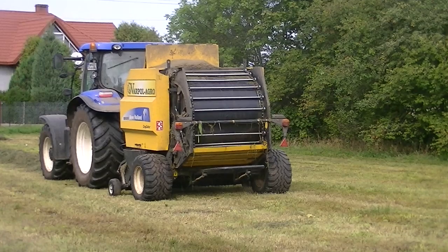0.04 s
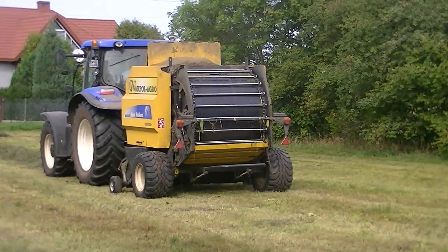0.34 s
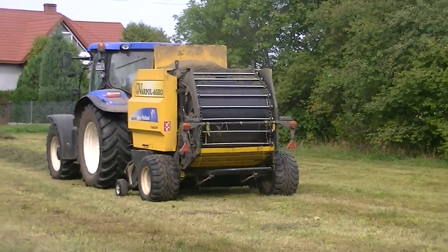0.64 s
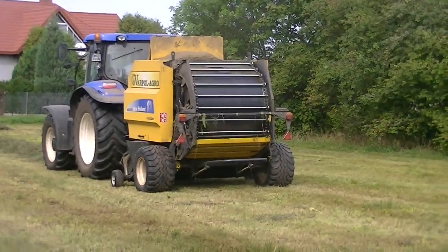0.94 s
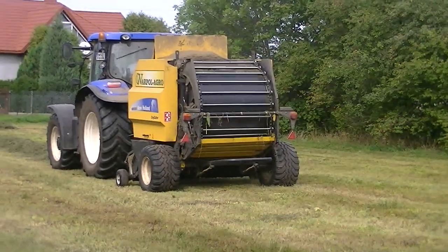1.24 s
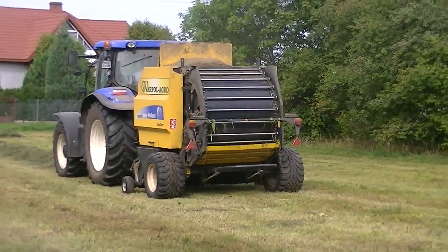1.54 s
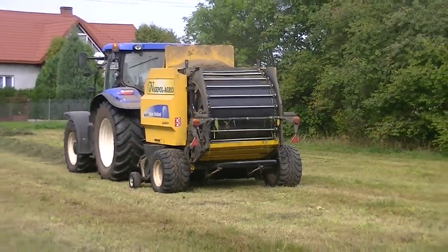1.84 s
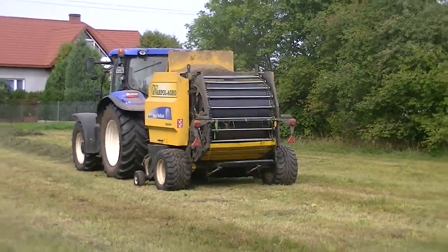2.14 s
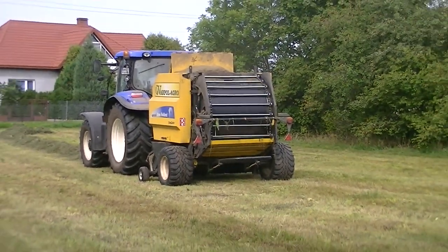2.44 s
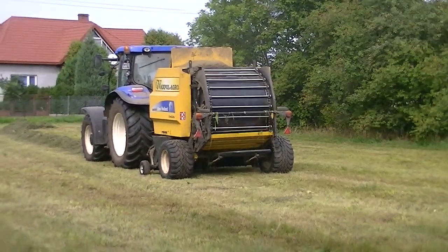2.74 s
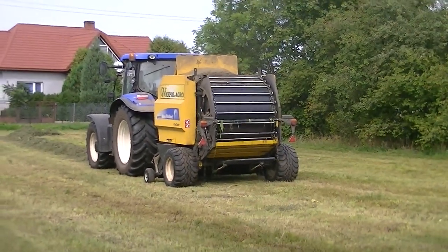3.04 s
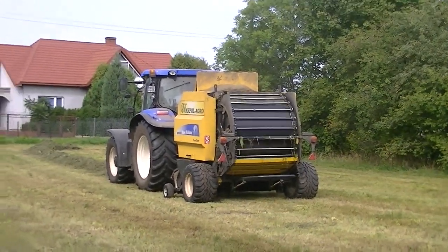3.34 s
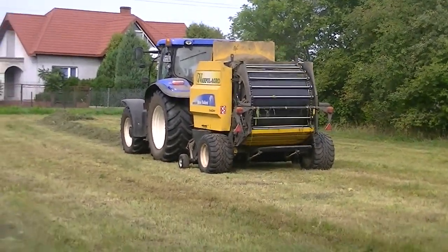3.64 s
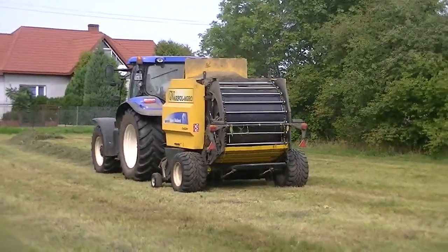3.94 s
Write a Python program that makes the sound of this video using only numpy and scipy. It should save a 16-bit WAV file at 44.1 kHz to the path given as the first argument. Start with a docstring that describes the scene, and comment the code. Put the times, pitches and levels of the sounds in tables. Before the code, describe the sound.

Rhythmic metal clatter and clanks come from a nearby hay baler working in an open field. Dry hay hisses, most at first, and the chain squeaks faintly, while the bale rumbles and bumps over a soft tractor drone.

```python
"""Sheet metal clatters, surging into a clank and a rebound about six times a second: a round hay baler
at work behind a tractor on a mown field, heard through one microphone near enough to catch the stalks.
Links and slats beat on the panels and the drive chain snaps tight against the frame. Underneath, the
bale rumbles and bumps in its chamber and the diesel drones. Dry hay hisses in the pickup, loudest at
first, and dry chain pins sing thinly."""
import sys
import numpy as np
from scipy import signal
from scipy.fft import rfft, irfft
from scipy.io import wavfile

SR = 44100
rng = np.random.default_rng(int(sys.argv[2]) if len(sys.argv) > 2 else 0)


def file_out(sig):
    """Save sig as 16-bit WAV at sys.argv[1]."""
    # one column per channel
    cols = np.atleast_2d(sig).T
    # limit, then scale
    lim = np.clip(cols, -1, 1)
    pcm = np.round(lim * 32767).astype(np.int16)
    wavfile.write(sys.argv[1], SR, pcm)


N = 176400
T = np.arange(N) / SR

# one row per turn of the drive: (time [s], clank [dB], clatter surge [dB], rebound delay [s], rebound [dB])
DRIVE_TURNS = [(0.105, -13, -23, 0.072, -8.5), (0.27, -14.5, -24, 0.052, -41),
               (0.435, -13.5, -19.5, 0.065, -7.5), (0.597, -14, -19, 0.075, -9.5),
               (0.762, -38, -19, 0.049, -13), (0.934, -22, -22, 0.061, -11.5),
               (1.094, -26, -18.5, 0.052, -16), (1.26, -22, -26, 0.065, -13),
               (1.424, -18, -21.5, 0.081, -15), (1.586, -15, -19, 0.06, -14.5),
               (1.755, -20.5, -20, 0.048, -12), (1.922, -24, -19.5, 0.043, -9.5),
               (2.081, -27, -19.5, 0.055, -11), (2.249, -20.5, -21.5, 0.058, -32),
               (2.412, -33, -21, 0.03, -17), (2.58, -20, -17, 0.078, -10.5),
               (2.735, -16, -21.5, 0.076, -30), (2.904, -16, -22.5, 0.036, -16),
               (3.062, -14.5, -18.5, 0.033, -41), (3.23, -16.5, -19, 0.024, -14),
               (3.392, -17, -19, 0.069, -15), (3.554, -13.5, -20.5, 0.05, -21),
               (3.719, -20.5, -22, 0.072, -15.5), (3.87, -46, -19, 0.094, -15)]
# low spectrum of the bale chamber and the exhaust: (frequency [Hz], level [dB])
RUMBLE_SPECTRUM = [(20, -49), (44, -48), (55, -33), (66, -50), (108, -15), (145, -0.5), (200, 3), (310, 0),
                   (450, -6), (900, -8.5), (3000, -65)]


def clatter(gain_db=-3.5, flutter_db=2.0):
    """Links and slats beat on the panels, harder at every turn and at its rebound."""
    # spectrum of a blow on sheet metal: (frequency [Hz], level [dB])
    blow_spectrum = [(30, -70), (100, -27), (300, -10.5), (480, -7), (650, -2.5), (900, -0.5), (1250, -2.5),
                     (1700, -6), (2200, -8.5), (2400, -11), (3300, -15), (4000, -26.5), (6000, -30),
                     (7300, -36), (7900, -49), (11000, -50.5), (15500, -62)]
    # panel resonances: (frequency [Hz], width [Hz], level [dB])
    panel_modes = [(401.7, 35, -12), (435, 68, -13.5), (559, 61, -4), (697, 90, 0.5), (773, 89, 0),
                   (1105, 140, 1), (1233, 67, 0), (1512, 106, -3), (1984, 92, 0.5), (2204, 98, -6.5),
                   (2626, 120, -10.5), (3179, 137, -4)]
    power = amp(-23 + flutter_db * drift(24)) ** 2
    for s, _, surge_db, delay, rebound_db in DRIVE_TURNS:
        power += (amp(surge_db + 3) * swell(s, rise_s=.033, fall_s=.025)) ** 2
        power += (amp(rebound_db - 6.5) * swell(s + delay, rise_s=.018, fall_s=.019)) ** 2
    force = np.sqrt(power)
    blows = force * impacts(per_s=3000, spread_db=0)
    loose_hits = amp(-32) * impacts(per_s=70, spread_db=1.5)
    knocking = through(blows + loose_hits, colour(blow_spectrum))
    ringing = through(force * impacts(per_s=900, spread_db=2), ring(panel_modes))
    return amp(gain_db) * (knocking + ringing)


def clanks():
    """Once a turn the chain snaps tight against the steel frame: a crack in a short jangle, then a slap."""
    # spectrum of the chain striking steel: (frequency [Hz], level [dB])
    crack_spectrum = [(200, -24), (900, -4), (1800, 1), (2500, 4), (3300, -19), (4100, -11), (4600, -27),
                      (4950, -12), (5400, -28), (7500, -30), (11000, -55), (15000, -76)]
    # frame resonances: (frequency [Hz], width [Hz], level [dB])
    frame_modes = [(1283, 58, -1), (1650, 40, -18.5), (1850, 360, 0), (2157, 33, 1.5), (2647, 89, -18.5),
                   (2850, 20, -13), (3080, 470, -2.5), (3647, 260, -6)]
    force = np.zeros(N)
    for s, clank_db, *_ in DRIVE_TURNS:
        crack = burst(s, rise_s=.004, fall_s=.007)
        jangle = amp(-7.5) * burst(s, rise_s=.012, fall_s=.016)
        slap = amp(-7) * burst(s + .019, rise_s=.004, fall_s=.007)
        force += amp(clank_db) * (np.hypot(crack, jangle) + slap)
    hits = force * impacts(per_s=4500, spread_db=-3.5)
    return amp(-5) * through(hits, colour(crack_spectrum)) + amp(-3) * through(hits, ring(frame_modes))


def bale_chamber(throb_hz=30.69, throb_depth=.18, boom_hz=198.5, waver_hz=30):
    """The bale rolls with a low throb and now and then bumps the chamber, which booms briefly."""
    # loudness of the rolling bale: (time [s], level [dB])
    roll_levels = [(0, -39), (.35, -41.5), (.7, -35), (1.3, -33.5), (1.9, -29.5), (2.6, -34), (2.85, -35.5),
                   (3.4, -34), (4, -36.5)]
    # knocks of the bale on the chamber: (time [s], relative level [dB])
    knocks = [(0.732, -14.5), (1.47, -26), (1.569, -34), (1.639, -20), (1.808, -13.5), (1.898, -32),
              (1.966, -20), (2.132, -19), (2.259, -26), (2.457, -21), (2.643, -17), (3.377, -23),
              (3.714, -17), (3.866, -14)]
    throb = 1 + throb_depth * np.cos(2 * np.pi * throb_hz * T + .3 * drift(2))
    roll = amp(contour(roll_levels)) * unit(throb * rng.standard_normal(N))
    pitch_hz = boom_hz + waver_hz * np.tanh(drift(40))
    boom = unit(np.sin(2 * np.pi * np.cumsum(pitch_hz) / SR))
    bumps = sum(amp(db - 11.5) * burst(s, rise_s=.01, fall_s=.016) for s, db in knocks)
    return through(roll, colour(RUMBLE_SPECTRUM)) + boom * bumps


def panel_hum():
    """The shaking keeps the hollow side panels sounding, most strongly at each turn of the drive."""
    # humming panel resonances: (frequency [Hz], width [Hz], level [dB])
    hum_modes = [(200, 31, -47), (394, 27, -49), (700, 51, -37), (770, 51, -40), (1135, 56, -39),
                 (1215, 51, -39), (2020, 81, -42)]
    shaking = unit(.55 + sum(burst(s, rise_s=.016, fall_s=.03) for s, *_ in DRIVE_TURNS))
    return shaking * sum(amp(db) * sing(hz, width) for hz, width, db in hum_modes)


def hay_hiss(flicker_db=3.4):
    """Dry stalks crackle and hiss in the pickup."""
    # spectrum of rustling hay: (frequency [Hz], level [dB])
    hay_spectrum = [(500, 13), (3000, -2), (5000, 6.5), (6300, 0), (8000, -5), (10500, -8), (12000, -23),
                    (15700, -33)]
    # loudness of the rustle: (time [s], level [dB])
    hay_levels = [(0, -37.5), (.3, -39.5), (.38, -43.5), (.54, -37.5), (.8, -44.5), (1.2, -48.5),
                  (1.9, -48), (2.8, -54), (3.4, -45.5), (3.93, -50.5), (3.98, -47)]
    level_db = contour(hay_levels) + flicker_db * drift(40)
    return amp(level_db) * through(impacts(per_s=6500, spread_db=-.5), colour(hay_spectrum))


def chain_squeaks(flicker_db=5):
    """Dry chain pins sing faintly and break into short squeaks."""
    # loudness of the faint singing: (time [s], level [dB])
    pin_levels = [(0, -64), (1.2, -52), (1.7, -46), (2.8, -46), (4, -47.5)]
    # single squeaks: (time [s], pitch [Hz], level [dB])
    squeaks = [(.075, 3150, -30), (.735, 3200, -29), (.765, 3180, -28), (.9, 3210, -30), (2.705, 3760, -35),
               (2.762, 3760, -35), (2.865, 3760, -35), (2.93, 3760, -35), (2.995, 3230, -33),
               (3.028, 3760, -35)]
    level_db = contour(pin_levels) + flicker_db * np.tanh(drift(35))
    singing = amp(level_db) * sing(hz=3720, width_hz=190)
    return singing + sum(amp(db) * burst(s, .008, .008) * sing(hz, width_hz=200) for s, hz, db in squeaks)


def diesel(firing_hz=85.55, wobble=.0076, level_db=-48.5):
    """The tractor's uneven firing pulses drone through the muffler."""
    firings = np.cumsum(firing_hz * (1 + wobble * drift(2))) / SR
    pulses = np.diff(np.floor(firings), prepend=0) * (1 + .5 * rng.standard_normal(N))
    return amp(level_db) * unit(through(pulses - pulses.mean(), colour(RUMBLE_SPECTRUM)))


def stalk_snaps():
    """Stalks break with a short bright crunch."""
    # breaking stalks: (time [s], fall time [s], level [dB])
    breaks = [(.53, 0.022, -40), (.655, .01, -39.5), (2.25, .008, -46), (3.856, .008, -41),
              (3.972, .008, -37)]
    # spectrum of the crunch: (frequency [Hz], level [dB])
    crunch_spectrum = [(1000, -16), (4000, 6), (7000, 5.5), (10500, -8.5), (13000, -19), (15700, -25)]
    force = sum(amp(db) * burst(s, fall_s / 2, fall_s) for s, fall_s, db in breaks)
    return through(force * impacts(per_s=3700, spread_db=3), colour(crunch_spectrum))


def scatter(x, t60_s=.069, level_db=-16.5, size=6000):
    """Short reflections inside the machine and off the ground follow the direct sound to the microphone."""
    t = T[:size]
    tail = rng.standard_normal(size) * amp(-60 * t / t60_s) * (t > .002)
    return x + amp(level_db) * through(x, tail / np.linalg.norm(tail))


def amp(db):
    """Decibels to gain."""
    return 10 ** (np.asarray(db) / 20)


def unit(x):
    """Scales to rms 1."""
    return x / np.sqrt(np.mean(x ** 2) + 1e-20)


def contour(points):
    """Joins (time [s], level [dB]) points with straight lines."""
    return np.interp(T, *np.transpose(points))


def drift(hz):
    """Random wander of rms 1, mostly slower than hz."""
    rolloff = np.exp(-(np.fft.rfftfreq(N, 1 / SR) / hz) ** 2)
    return unit(irfft(rfft(rng.standard_normal(N)) * rolloff, N))


def colour(points, size=4096):
    """Minimum-phase impulse response of energy 1 with the given spectrum shape."""
    hz, db = np.transpose(points)
    bin_hz = abs(np.fft.fftfreq(size, 1 / SR)) + 1
    log_gain = np.log(amp(np.interp(np.log(bin_hz), np.log(hz), db)))
    h = np.fft.ifft(np.exp(np.conj(signal.hilbert(log_gain)))).real
    return h / np.linalg.norm(h)


def ring(modes, size=4096):
    """Impulse response of energy 1 of damped resonances, band-limited around them."""
    t = T[:size]
    h = np.zeros(size)
    for k, (hz, width, db) in enumerate(modes):
        decay = amp(db) * np.sqrt(width) * np.exp(-np.pi * width * t)
        h += (-1) ** k * decay * np.sin(2 * np.pi * hz * t)
    band = signal.butter(4, [modes[0][0] * .8, modes[-1][0] * 1.15], "band", fs=SR, output="sos")
    h = signal.sosfilt(band, h)
    return h / np.linalg.norm(h)


def through(x, h):
    """Plays x through an impulse response."""
    return signal.oaconvolve(x, h)[:N]


def impacts(per_s, spread_db):
    """Random clicks of rms 1; spread_db makes their sizes uneven."""
    size = amp(spread_db * np.minimum(rng.exponential(1, N), 3)) * rng.choice([-1, 1], N)
    return unit(size * (rng.random(N) < per_s / SR))


def swell(s, rise_s, fall_s):
    """Pointed envelope that builds up to time s and dies away."""
    return np.exp(-np.maximum((s - T) / rise_s, (T - s) / fall_s))


def burst(s, rise_s, fall_s):
    """Rounded envelope that peaks at time s."""
    return np.exp(-((T - s) / np.where(T < s, rise_s, fall_s)) ** 2)


def sing(hz, width_hz):
    """A rubbed or shaken resonance: a fuzzy tone of rms 1."""
    phase = 2 * np.pi * hz * T
    return drift(width_hz / 2) * np.cos(phase) + drift(width_hz / 2) * np.sin(phase)


def scene():
    """The baler's metal noises over the low drone, in mono at the microphone."""
    rattle = scatter(clatter() + clanks() + hay_hiss() + stalk_snaps())
    return (rattle + panel_hum() + chain_squeaks() + bale_chamber() + diesel())[None]


def record(dry):
    """The recorder opens after a moment, cuts the deep bass and limits the treble."""
    start_s, low_cut_hz, high_cut_hz = .04, 77, 15750
    low_cut = signal.butter(5, low_cut_hz, "high", fs=SR, output="sos")
    high_cut = signal.firwin(511, high_cut_hz, window=("kaiser", 9), fs=SR)
    thinned = signal.sosfilt(low_cut, dry * (T > start_s))
    return signal.oaconvolve(thinned, high_cut[None], "same")


dry = scene()
out = record(dry)
file_out(out)
```